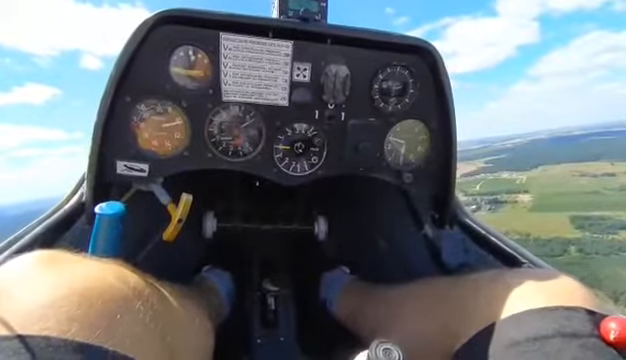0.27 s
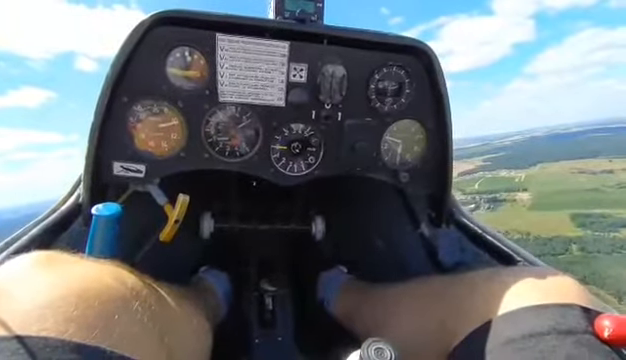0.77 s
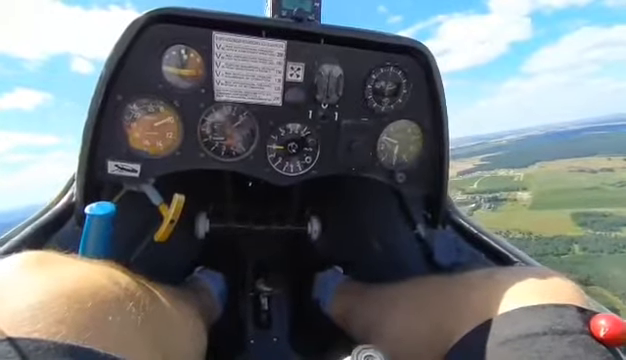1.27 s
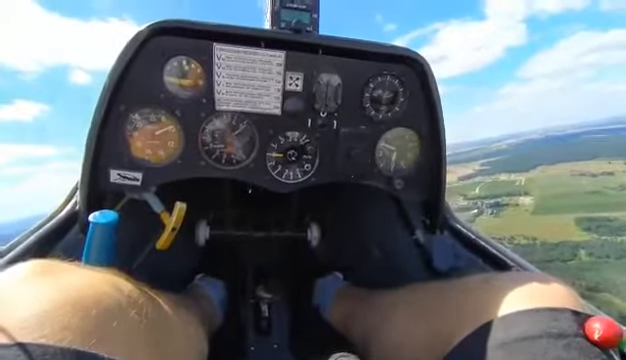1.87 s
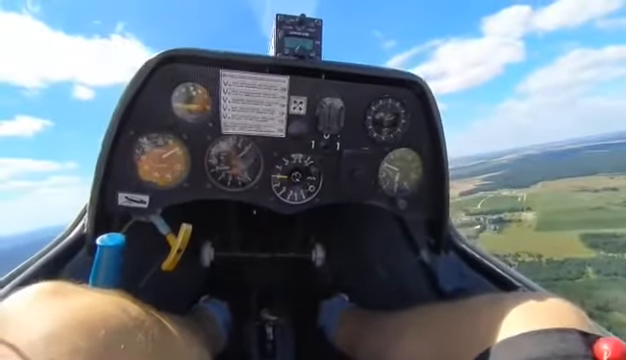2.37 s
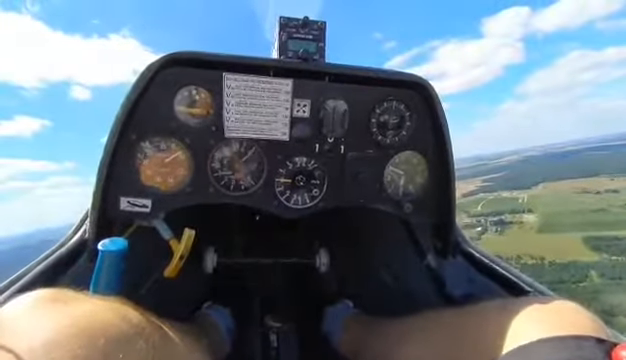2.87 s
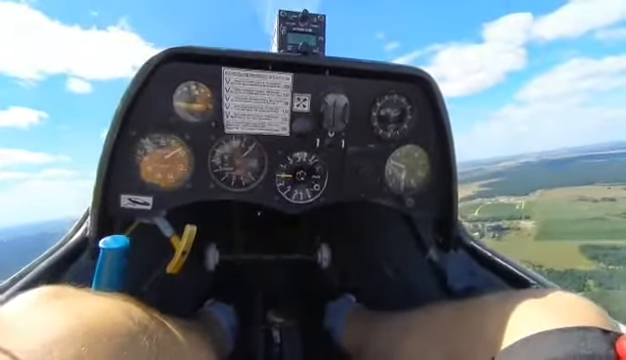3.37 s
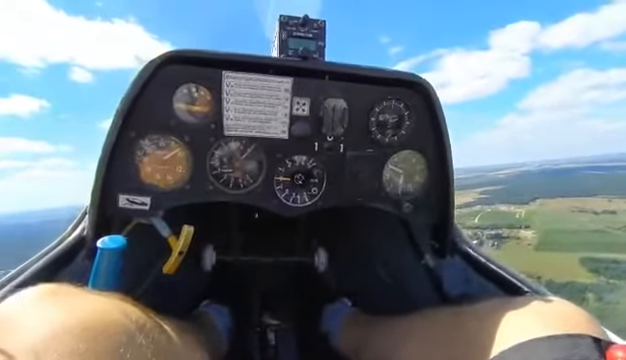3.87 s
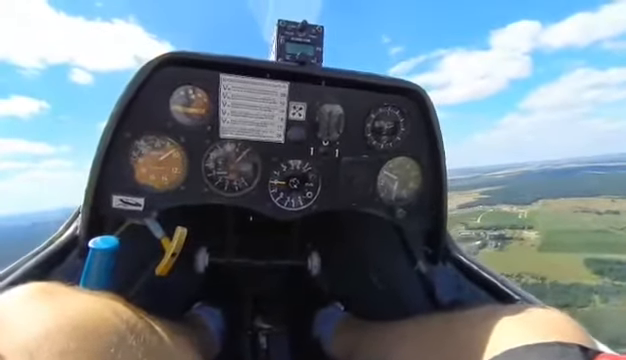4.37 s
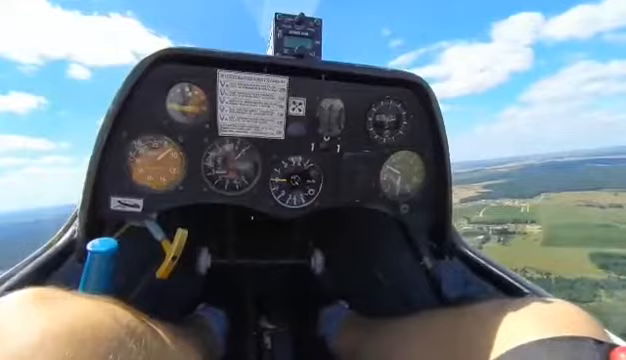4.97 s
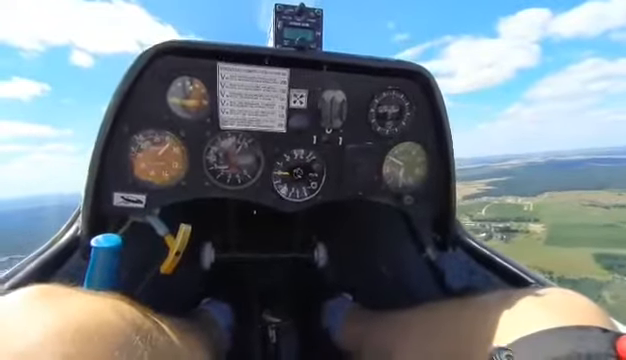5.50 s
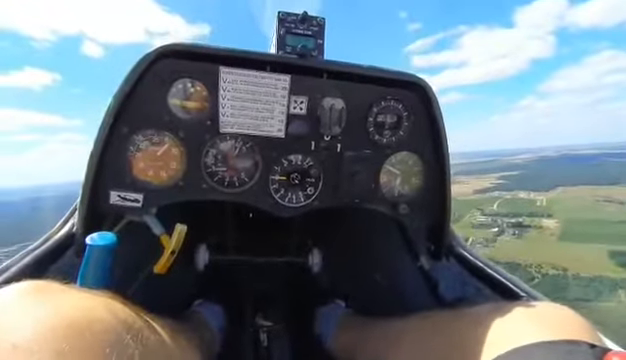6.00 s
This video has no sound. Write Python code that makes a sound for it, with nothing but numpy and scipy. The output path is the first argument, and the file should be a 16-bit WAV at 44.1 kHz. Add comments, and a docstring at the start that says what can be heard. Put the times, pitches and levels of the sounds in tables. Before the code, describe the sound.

Wind roars and hisses around a small engineless aircraft cabin, low buffets thudding, while a fluttering canopy-gap whistle sinks away, then comes back.

```python
"""Air rushing over the canopy of a glider in flight, heard in the cockpit: roar and seal hiss are shaped
noise that eases as the airspeed falls. A canopy gap whistles in two strands, fuzzy edge tones through
fixed resonances, that sink, die away and return on the left. Turbulence booms in the cabin's air modes,
gusts drum on the shell, a vent moans faintly as narrow noise, and the fuselage rumbles."""
import sys
import numpy as np
from scipy import signal
from scipy.fft import rfft, irfft, next_fast_len
from scipy.io import wavfile
from scipy.ndimage import uniform_filter1d

SR = 44100
rng = np.random.default_rng(int(sys.argv[2]) if len(sys.argv) > 2 else 0)


def inscribe(sig):
    """Save sig as 16-bit PCM at rate SR to the path in sys.argv[1].

    A 1-D sig is mono; a 2-D sig holds one channel per row.
    Samples are clipped to [-1, 1] before scaling.
    """
    pcm = np.round(np.clip(np.atleast_2d(sig).T, -1, 1) * 32767)
    wavfile.write(sys.argv[1], SR, pcm.astype(np.int16))


N = 275165

# airflow strength, used relative to its mean: [t/s, hiss level/dB]
AIRFLOW = [(0, -36), (.55, -37), (.72, -38), (1.13, -37.4), (1.35, -38.5), (1.7, -38.3), (2.2, -39),
           (2.9, -39), (3.1, -38.5), (3.5, -39.5), (4.1, -39), (4.4, -40.5), (4.75, -40), (5.25, -42.5),
           (5.87, -41), (6.08, -42.5), (6.24, -40.5)]


def rush(spectrum_rows, follow, slide_per_db):
    """Flow noise at two ears: faster air is louder and slides the spectrum up; the level flutters."""
    frame, hop = 1024, 256
    patchy_db, flutter_db = 1.8, .42  # random flutter in time-frequency patches, and over the whole band
    frames = N // hop + 5
    flow_db = swing_db(AIRFLOW, np.arange(frames) * hop / SR)[:, None]
    hz = np.fft.rfftfreq(frame, 1 / SR) / (1 + slide_per_db * flow_db)

    f, *columns = np.transpose(spectrum_rows)
    left_db, right_db, same = (np.interp(np.log(hz + 1), np.log(f), c) for c in columns)
    a, b = rng.standard_normal((2, *hz.shape)) + 1j * rng.standard_normal((2, *hz.shape))
    z = two_ears(a, b, left_db, right_db, same)

    beyond_db = -24 * np.log2(np.maximum(hz / f[-1], 1))  # 24 dB/octave above the last row
    patches = drift(hz.shape, size=5, order=30)
    whole_band = drift((frames, 1), size=4, order=1)
    random_db = patchy_db * patches + flutter_db * whole_band
    depth = np.minimum(hz / 5000, 1)  # flutter grows with frequency up to 5 kHz
    z *= gain_of(beyond_db + follow * flow_db + depth * random_db)
    x = signal.istft(z.transpose(0, 2, 1), nperseg=frame, noverlap=frame - hop)[1][:, :N]
    return x * np.sqrt(3 * SR / frame / 2)  # dB per Hz to spectrum bins


def roar():
    """Low and middle flow noise on the shell."""
    # flow noise on the shell at mean airflow: [f/Hz, left/dB per Hz, right/dB per Hz, ear likeness/-1..1]
    roar_rows = [(50, -78, -78, .8), (86.5, -66, -65.5, 0.82), (115, -50, -56, 0.98),
                 (218, -47, -54.5, 0.65), (300.4, -47.5, -56, 0.55), (367, -52.5, -62, -0.73),
                 (420, -56.5, -56.5, -0.085), (487, -62, -63.5, 0.54), (607, -63, -64, 0.45),
                 (655, -63, -66.5, -0.09), (866, -62, -63.5, 0.72), (1154, -62.5, -67, 0.14),
                 (1730, -66.5, -74.5, -0.5)]
    return rush(roar_rows, follow=0.45, slide_per_db=0.011)


def hiss():
    """Treble flow noise through the canopy seals; follows the airflow more closely than the roar."""
    # seal noise at mean airflow: [f/Hz, left/dB per Hz, right/dB per Hz, ear likeness/-1..1]
    hiss_rows = [(775, -102, -82.5, 0.063), (1300, -68, -63, -0.082), (1480, -66, -62, -0.082),
                 (1920, -65.5, -62.5, -0.082), (2200, -62.5, -60.5, 0.17), (2754, -70.5, -66.5, -0.17),
                 (3240, -66.5, -73, -0.13), (3530, -73.5, -71.5, -0.11), (4480, -71, -73, 0.12),
                 (4900, -74, -74.5, -0.079), (6630, -74.5, -75, 0.078), (7160, -70.5, -70.5, 0.059),
                 (9200, -75, -69.5, -0.023), (10750, -71.5, -72, 0.11), (13070, -103.5, -103, 0.052)]
    return rush(hiss_rows, follow=0.86, slide_per_db=0.0031)


def whistle():
    """Two edge tones slide across fixed canopy resonances, giving way now and then to a purer flare."""
    # higher edge tone of the gap: [t/s, f/Hz, level before trim/dB]
    high_rows = [(0, 1810, -39), (.5, 1836, -36), (1, 1818, -31.5), (1.4, 1790, -34.5), (2.3, 1801, -27),
                 (2.75, 1799, -29.5), (3.1, 1745, -31), (3.4, 1800, -31), (3.75, 1805, -29.5),
                 (4.15, 1770, -30.5), (4.55, 1644, -32.5), (4.95, 1527, -45), (5.4, 1570, -58),
                 (5.8, 1720, -48), (6.24, 1720, -37)]
    # lower edge tone of the gap: [t/s, f/Hz, level before trim/dB]
    low_rows = [(0, 1678, -41), (1, 1694, -31.5), (1.5, 1628, -39), (2.351, 1686, -29.5),
                (2.95, 1603, -30.5), (3.7, 1655, -31.5), (4.249, 1570, -30), (4.5, 1505, -33),
                (4.85, 1407, -42), (5.4, 1478, -59), (5.7, 1655, -42), (6.24, 1650, -32)]
    # the gap catches the flow and the whistle flares: [t/s, f/Hz, level before trim/dB]
    flare_rows = [(.47, 1853, -26), (.56, 1865, -32), (.975, 1823, -21.5), (1.075, 1816, -26.5),
                  (1.2, 1813, -30), (1.34, 1795, -29), (1.58, 1784, -24), (1.74, 1772, -26),
                  (1.93, 1810, -25.5), (2.12, 1797, -20.5), (2.197, 1787, -21), (2.31, 1730, -21.5),
                  (2.405, 1823, -21), (2.535, 1790, -28), (2.77, 1678, -19.5), (2.95, 1714, -26),
                  (3.055, 1707, -25), (3.325, 1795, -22.5), (3.46, 1814, -30), (3.615, 1810, -26),
                  (3.709, 1816, -23.5), (3.865, 1760, -24), (3.92, 1793, -22.5), (4.005, 1765, -24),
                  (4.125, 1750, -18.5), (4.305, 1660, -27), (4.46, 1490, -29), (4.55, 1644, -30),
                  (4.78, 1575, -35), (5.71, 1658, -33.5), (5.96, 1660, -26.5), (6.08, 1672, -30),
                  (6.2, 1663, -18.5)]
    trim_db, flare_trim_db = -0.6, .4
    tone_width_hz, flare_width_hz, flare_s = 84, 52, .081
    high_pure, low_pure, flare_pure = .36, .12, .5  # power share of the thin line
    takeover_db = -24  # flares above this displace the steady tones
    t, response = np.arange(N) / SR, canopy()
    flutter_db = 2.6 * waver(rate_hz=20)

    tones = 0
    for rows, pure in ((high_rows, high_pure), (low_rows, low_pure)):
        tone = edge_tone(rows, tone_width_hz, pure, .076, response)
        tones = tones + tone * gain_of(curve([(s, db) for s, _, db in rows], t))
    tones = tones * gain_of(trim_db + flutter_db)

    flaring = swells([(s, db) for s, _, db in flare_rows], flare_s)
    flares = edge_tone(flare_rows, flare_width_hz, flare_pure, .025, response) * flaring
    ducking = np.hypot(1, flaring / gain_of(takeover_db))
    return tones / ducking + flares * gain_of(flare_trim_db)


def edge_tone(rows, width_hz, pure, steady_s, response):
    """An unsteady jet, a thin line in a fuzzy band, rings the canopy; two ears, mean power 1."""
    # stereo balance of the whistle: [t/s, left over right/dB]
    side_rows = [(4.8, -1.5), (5.65, 10)]
    wander_hz, wander_rate_hz = 15, 11
    t, (times, hz, _) = np.arange(N) / SR, np.transpose(rows)
    pitch_hz = np.interp(t, times, hz) + wander_hz * waver(wander_rate_hz)
    line_and_band = np.sqrt(2 * pure) + np.sqrt(1 - pure) * blown(0, width_hz)
    jet = line_and_band * np.exp(2j * np.pi * np.cumsum(pitch_hz) / SR)
    ears = np.fft.ifft(np.fft.fft(jet, response.shape[1]) * response)[:, :N]
    side_db = np.outer([.5, -.5], curve(side_rows, t))
    return steadied(ears * gain_of(side_db), steady_s).real


def canopy():
    """Frequency response of the canopy resonances from the gap to each ear."""
    # canopy resonances, relative levels: [f/Hz, width/Hz, left/dB, right/dB, right lead/rad]
    canopy_rows = [(1470, 47, -2, 1, 4), (1540, 30, 5, 0, -2), (1595, 26, -2.5, -1, -.5),
                   (1655, 20, 0.5, 5.5, -2), (1692, 28, -1, 4, 3.5), (1745, 47, -8, 4.3, 1.7),
                   (1791, 29, 1.5, 6.5, -1), (1827, 25, 0, 7.5, 0.8), (1860, 26, -8, 5.5, 3),
                   (1914, 29, 12.5, -8, -2)]
    f = np.fft.fftfreq(next_fast_len(N), 1 / SR)
    near = (f > 1000) & (f < 2500)
    response = np.zeros((2, len(f)), complex)
    for hz, width_hz, left_db, right_db, lead_rad in canopy_rows:
        ears = [gain_of(left_db), gain_of(right_db) * np.exp(1j * lead_rad)]
        response[:, near] += np.outer(ears, (1 + ((f[near] - hz) / width_hz) ** 2) ** -2)
    return response


def boom():
    """Turbulence rings the cabin's air modes, harder in faster air and at each buffet."""
    # cabin air modes, relative levels: [f/Hz, width/Hz, level/dB]
    cabin_rows = [(160.2, 18, 1), (174.8, 21, -8), (192.8, 18, -6.5)]
    # hardest buffets of turbulence: [t/s, level/dB]
    buffet_rows = [(.027, -28), (.175, -17), (.24, -31), (.71, -27), (1.048, -27), (1.155, -21),
                   (1.275, -22.5), (1.338, -27), (1.455, -20), (1.599, -19), (1.74, -22), (2.115, -23),
                   (2.24, -19), (2.371, -25), (2.53, -28), (2.69, -20), (2.925, -28), (3.089, -22.5),
                   (3.569, -22), (3.748, -27), (4.07, -21.5), (4.328, -20.5), (4.45, -25.5), (4.505, -25),
                   (4.798, -27), (4.905, -27), (5.072, -30), (5.552, -27.5), (5.76, -21.5), (5.949, -22.5),
                   (6.137, -22), (6.217, -25)]
    buffet_s, between_db, follow = .088, -24, .1
    left_db, lead_rad = 6, .26  # left over right level, right phase lead
    air = sum(gain_of(db) * blown(hz, width_hz) for hz, width_hz, db in cabin_rows)
    buffets = steadied(air, .04) * swells(buffet_rows, buffet_s)
    flow_db = swing_db(AIRFLOW, np.arange(N) / SR)
    z = steadied(air, .15) * gain_of(between_db + follow * flow_db) + buffets
    ears = np.array([gain_of(left_db), np.exp(1j * lead_rad)])
    return np.outer(ears / np.sqrt(np.mean(abs(ears) ** 2)), z).real


def surges():
    """Gusts drum briefly on the shell, a noise band just above the cabin boom."""
    # drumming gusts: [t/s, level before ear gains/dB]
    surge_rows = [(.04, -26.5), (.18, -26.5), (.445, -30), (.6, -30), (.775, -27.5), (.86, -28), (.98, -29),
                  (1.15, -31), (2.13, -30), (2.68, -30), (3.2, -32), (3.59, -28.5), (3.76, -30.5),
                  (3.92, -32), (4.86, -32), (4.98, -33)]
    surge_s, left_db, right_db = .12, 2, -4
    drumming = steadied(blown(hz=290, width_hz=120), .03).real
    return np.outer(gain_of([left_db, right_db]), drumming * swells(surge_rows, surge_s))


def moans():
    """Air across the vent and narrower openings sounds faint fuzzy tones that waver in the gusts."""
    # blown resonances, vent first: [f/Hz, width/Hz, level before waver/dB, left over right/dB, right lead/rad]
    moan_rows = [(1012, 28, -41.8, 2, 0.86), (970, 42, -42, 2, 0.46), (877, 24, -48.5, 5, 0.19),
                 (824, 28, -48, 0, 0.011), (619.4, 26, -50, 6, 0.021), (1147, 70, -52, 4, 0),
                 (2063, 90, -45, -9, 0.34), (3880, 170, -50.8, -3.5, 1), (5440, 240, -50.5, 2, -0.81)]
    waver_db, wander_hz, rate_hz, follow = 1.6, 6, 4.5, .38
    out = np.zeros((2, N))
    for hz, width_hz, db, left_db, lead_rad in moan_rows:
        wander = np.exp(2j * np.pi * np.cumsum(wander_hz * waver(rate_hz)) / SR)
        z = blown(hz, width_hz) * wander * gain_of(waver_db * waver(rate_hz))
        left = z * gain_of(db + left_db / 2)
        right = z * np.exp(1j * lead_rad) * gain_of(db - left_db / 2)
        out += np.array([left, right]).real
    return out * gain_of(follow * swing_db(AIRFLOW, np.arange(N) / SR))


def rumble():
    """Deep shaped noise of the fuselage, swelling at each bump of rough air."""
    # steady fuselage rumble: [f/Hz, left/dB per Hz, right/dB per Hz, ear likeness/-1..1]
    rumble_rows = [(5, -70, -68, .9), (20, -55, -59, .94), (52.3, -50, -54, 0.87), (75, -59.5, -68, 1)]
    # bumps of rough air: [t/s, swell added, re steady rumble/dB]
    bump_rows = [(3.09, 1), (3.63, 4), (4.92, 3)]
    bump_s = .26
    hz = np.fft.rfftfreq(N, 1 / SR)
    f, *columns = np.transpose(rumble_rows)
    left_db, right_db, same = (np.interp(hz, f, c) for c in columns)
    a, b = rfft(rng.standard_normal((2, N)))
    z = two_ears(a, b, left_db, right_db, same)
    z /= np.maximum(hz / f[-1], 1) ** 5  # 30 dB/octave above the last row
    return irfft(z, N) * np.sqrt(SR / 2) * (1 + swells(bump_rows, bump_s))


def two_ears(a, b, left_db, right_db, same):
    """Mixes two independent noise spectra into ears of the given levels and likeness."""
    same = np.clip(same, -1, 1)
    right = same * a + np.sqrt(1 - same ** 2) * b
    return np.array([a * gain_of(left_db), right * gain_of(right_db)])


def blown(hz, width_hz):
    """Turbulence ringing a steady steep-skirted resonance: complex noise, real part of power 1."""
    size = next_fast_len(N)
    offset = (np.fft.fftfreq(size, 1 / SR) - hz) / width_hz
    near = abs(offset) < 8
    spectrum = np.zeros(size, complex)
    a, b = rng.standard_normal((2, near.sum()))
    spectrum[near] = (a + 1j * b) / (1 + 1j * offset[near]) ** 3
    z = np.fft.ifft(spectrum)[:N]
    return z / z.real.std()


def steadied(z, seconds):
    """Holds ringing power steady over the given time; faster flutter stays."""
    power = (abs(np.atleast_2d(z)) ** 2).mean(0) / 2
    span = max(int(seconds * SR), 2)
    smooth = uniform_filter1d(uniform_filter1d(power, span), span)
    return z / np.sqrt(abs(smooth) + 1e-12)


def swells(rows, seconds):
    """Amplitude of brief swells, each of the given length, centred on the row times."""
    t, out = np.arange(N) / SR, np.zeros(N)
    for at, db in rows:
        out += gain_of(db) * np.maximum(1 - (2 * (t - at) / seconds) ** 2, 0) ** 2
    return out


def waver(rate_hz):
    """Chance curve of rms 1: 24 sines within an octave either side of the rate."""
    t = np.arange(N) / SR
    knots = np.arange(0, t[-1] + .01, .004)
    rates = rate_hz * 2 ** rng.uniform(-1, 1, (24, 1))
    phases = rng.random((24, 1))
    return np.interp(t, knots, evened(np.sin(2 * np.pi * (rates * knots + phases)).sum(0)))


def drift(shape, size, order):
    """Chance flutter of rms 1, smooth over size frames and order bins, with no slow swell."""
    z = uniform_filter1d(rng.standard_normal(shape), size, -2)
    z = z - uniform_filter1d(z, size=24, axis=-2)
    return evened(uniform_filter1d(z, order, -1))


def swing_db(rows, t):
    """A level curve relative to its own mean."""
    level_db = curve(rows, t)
    return level_db - level_db.mean()


def curve(rows, t):
    """Reads (s, value) rows at the times t."""
    return np.interp(t, *np.transpose(rows))


def evened(x):
    """Scales to rms 1."""
    return x / np.sqrt(np.mean(x ** 2) + 1e-20)


def gain_of(db):
    """Decibels to amplitude."""
    return 10 ** (np.asarray(db) / 20)


def scene():
    """Sum of all the airflow sounds at the seat, two ears."""
    return roar() + hiss() + whistle() + boom() + surges() + moans() + rumble()


def record(dry):
    """Linear-phase low-pass that removes the top treble."""
    edge_hz = 13100
    lowpass = signal.firwin(511, edge_hz, window=("kaiser", 9), fs=SR)
    return signal.oaconvolve(dry, lowpass[None], "same")


dry = scene()
out = record(dry)
inscribe(out)
```